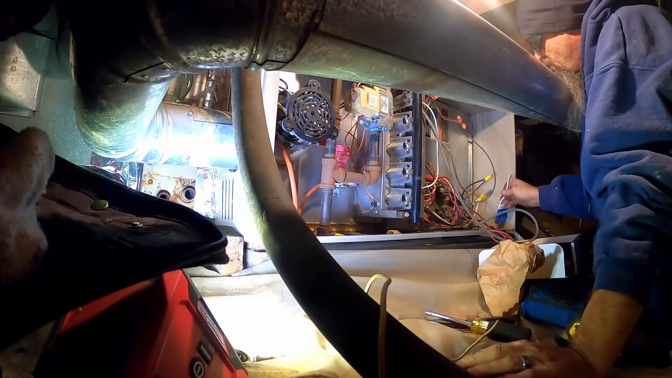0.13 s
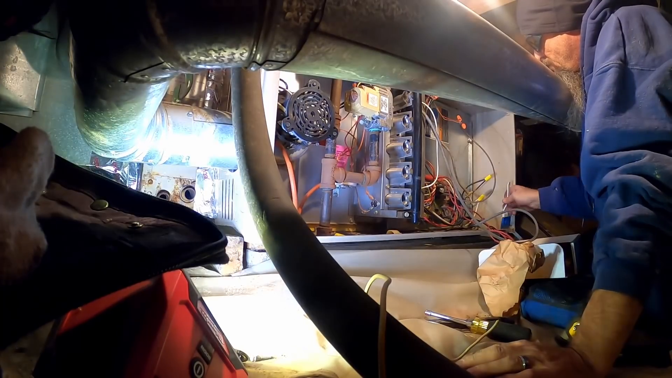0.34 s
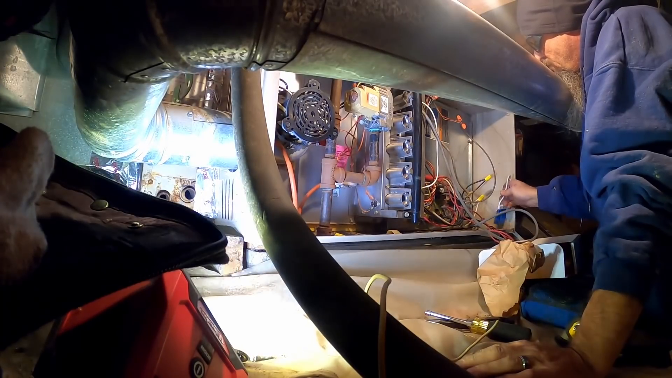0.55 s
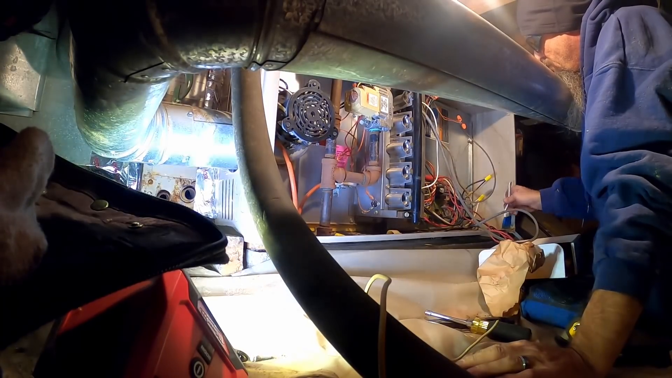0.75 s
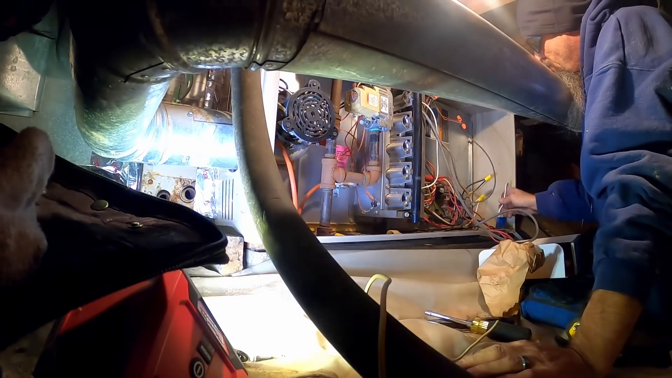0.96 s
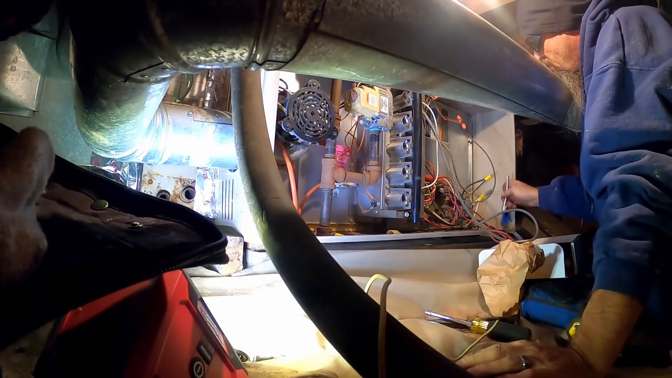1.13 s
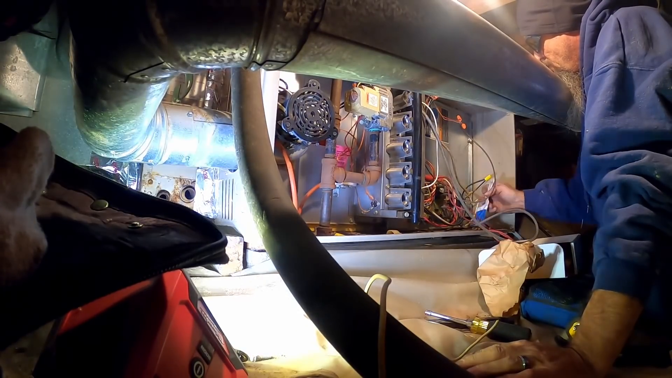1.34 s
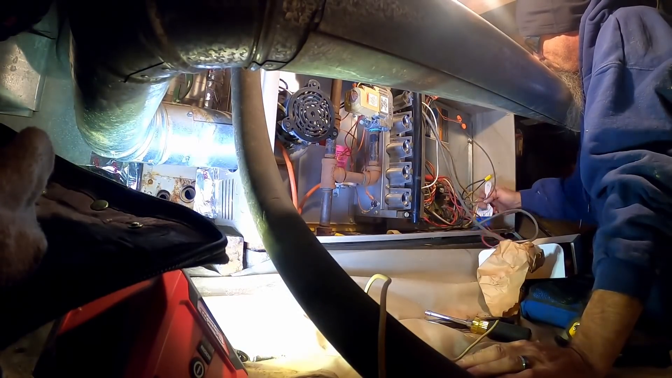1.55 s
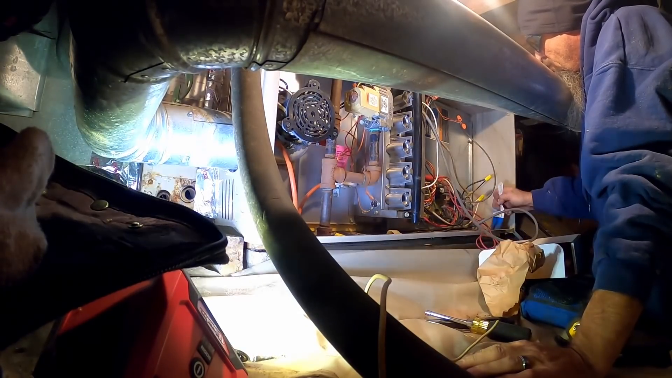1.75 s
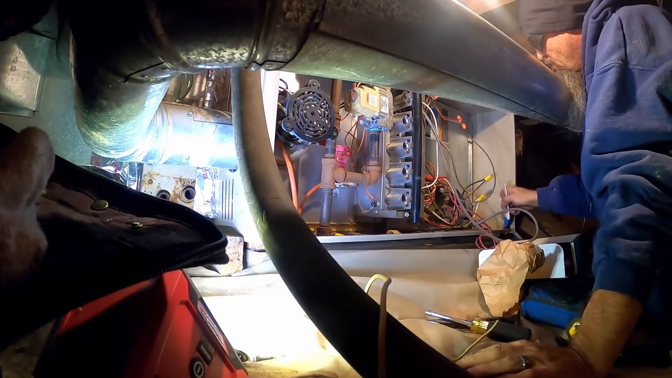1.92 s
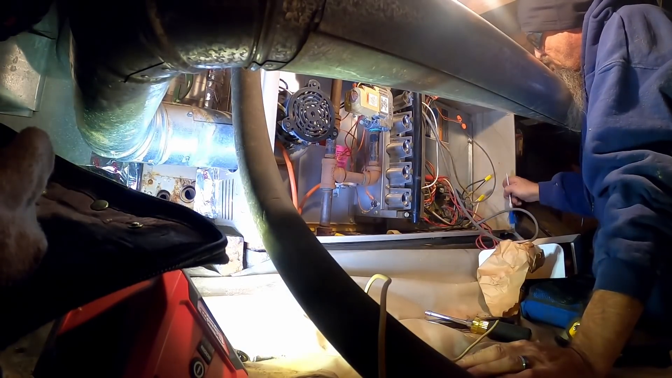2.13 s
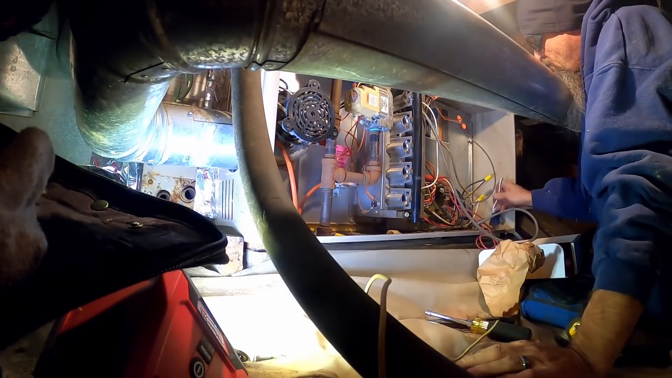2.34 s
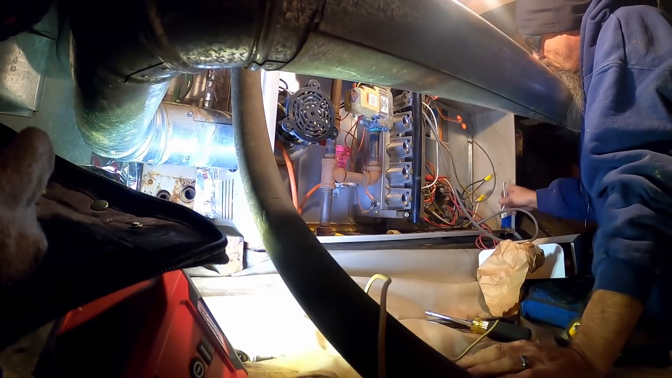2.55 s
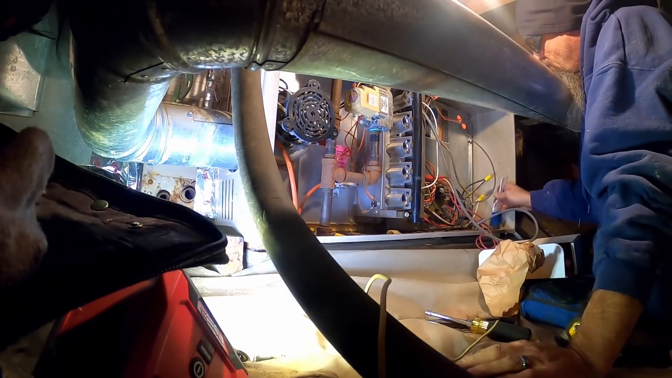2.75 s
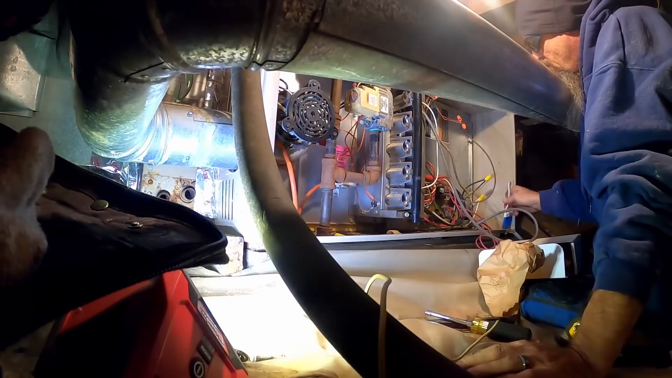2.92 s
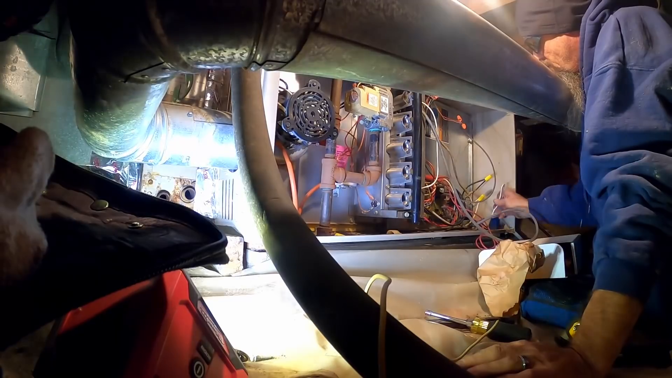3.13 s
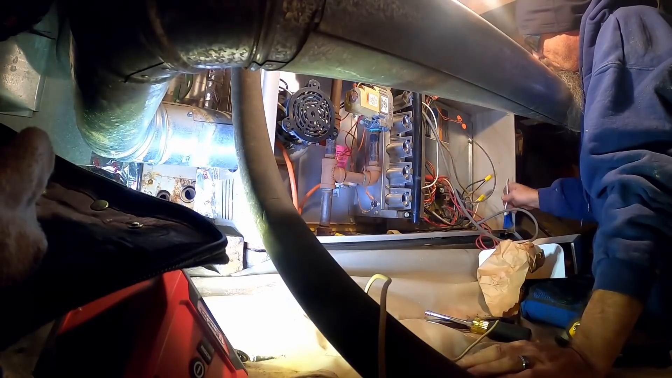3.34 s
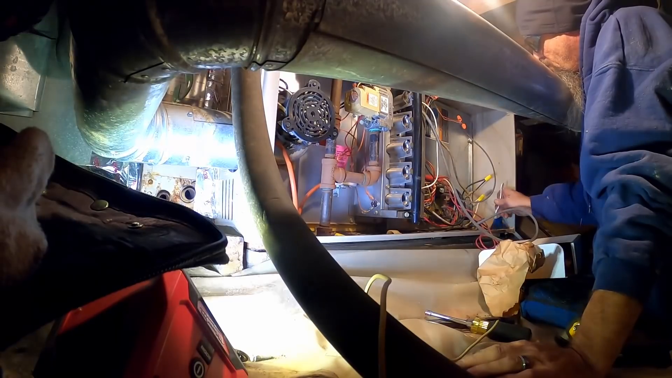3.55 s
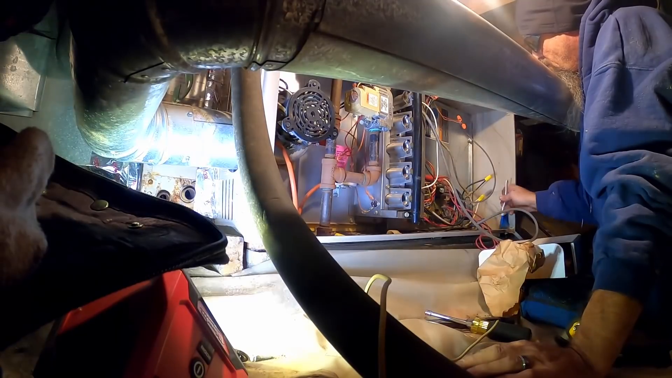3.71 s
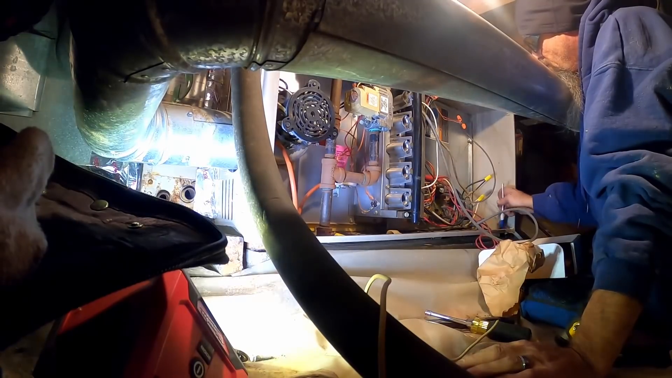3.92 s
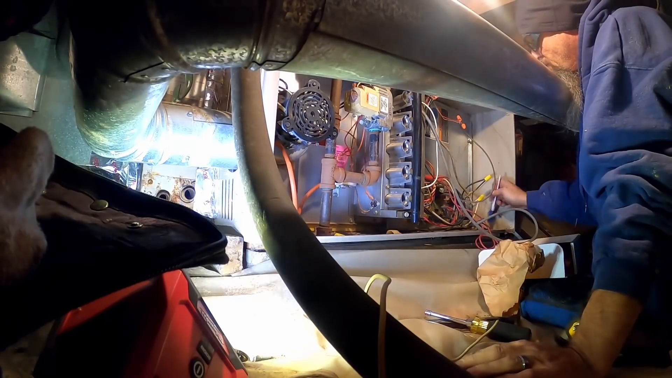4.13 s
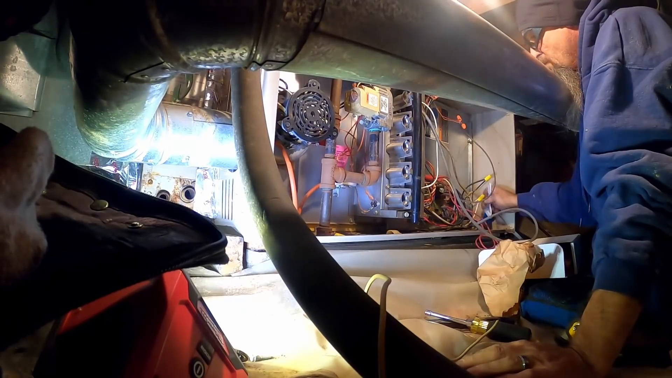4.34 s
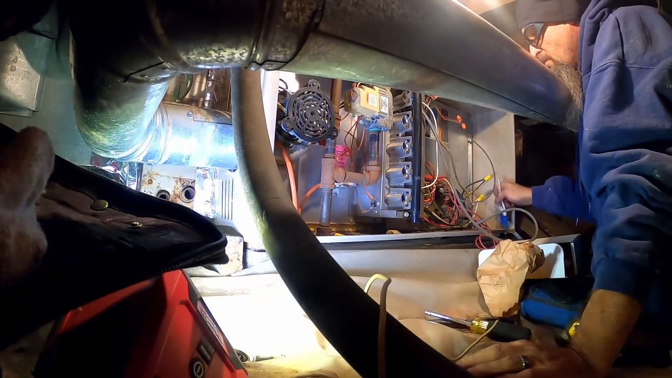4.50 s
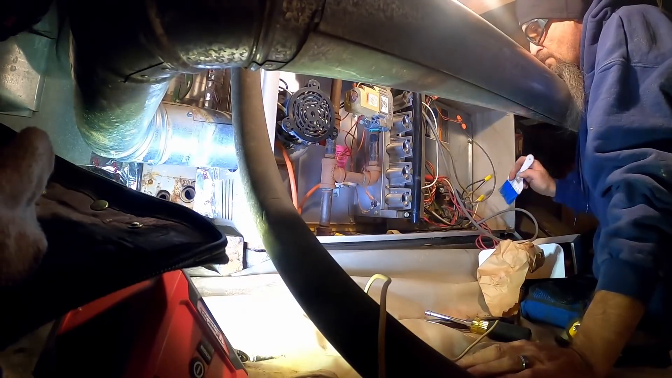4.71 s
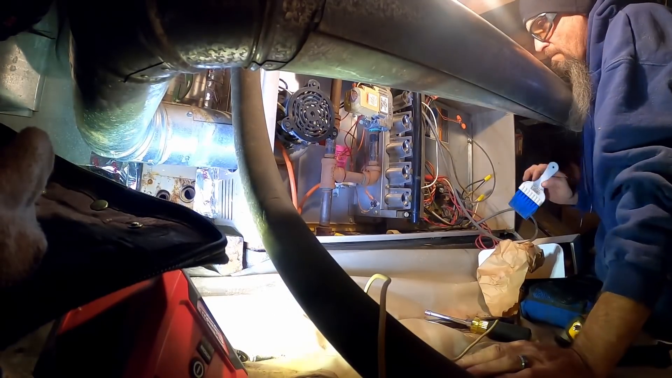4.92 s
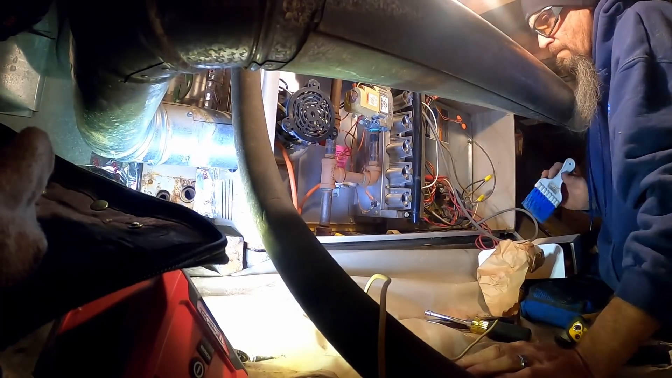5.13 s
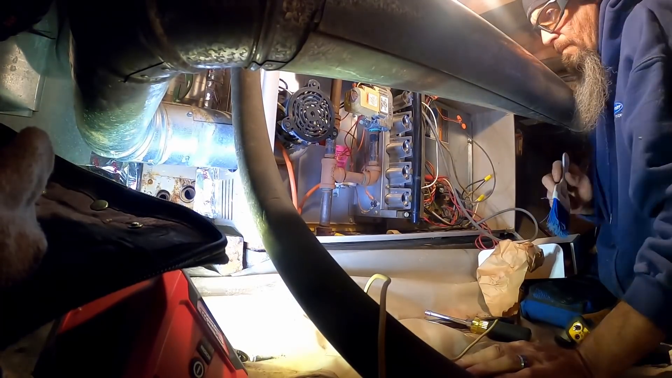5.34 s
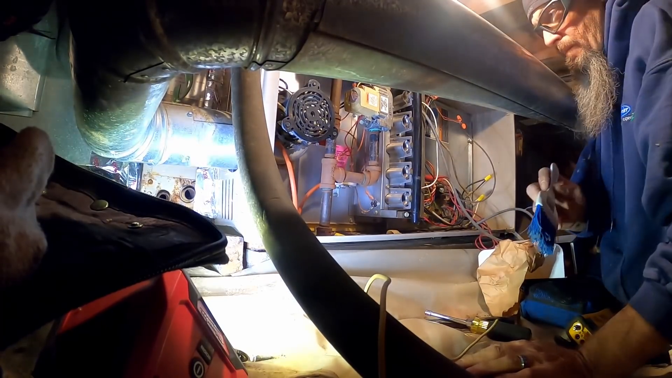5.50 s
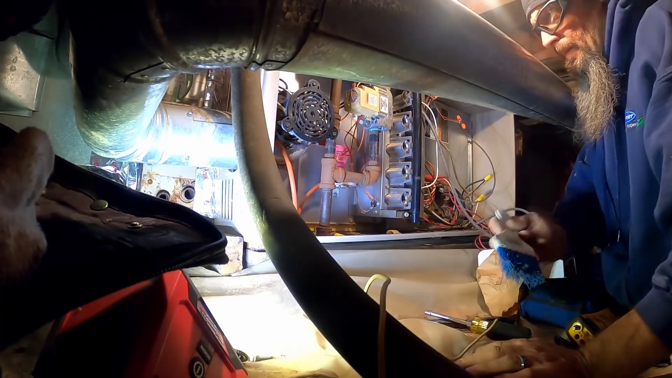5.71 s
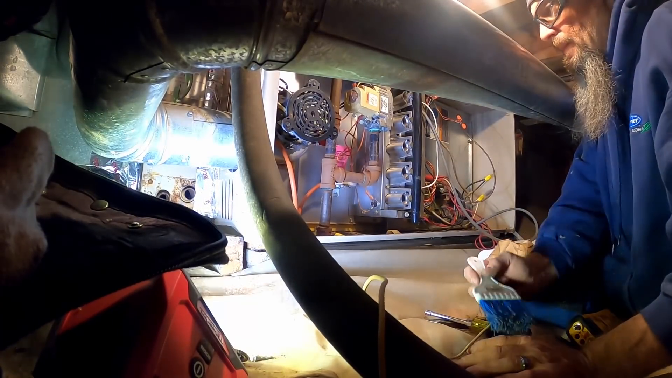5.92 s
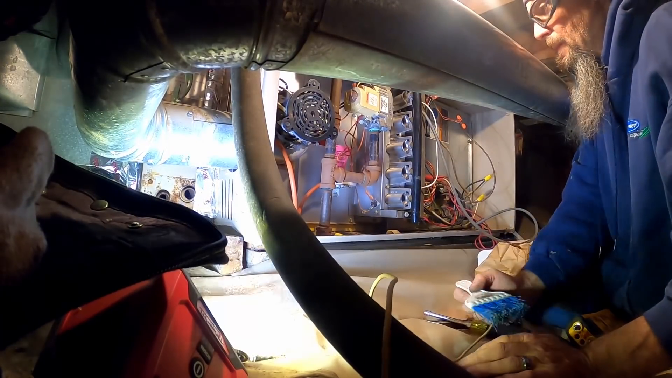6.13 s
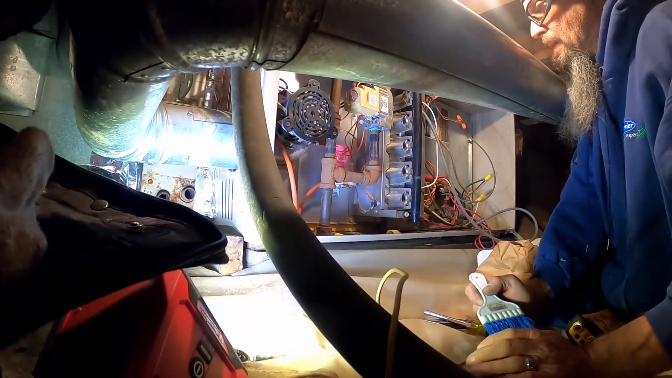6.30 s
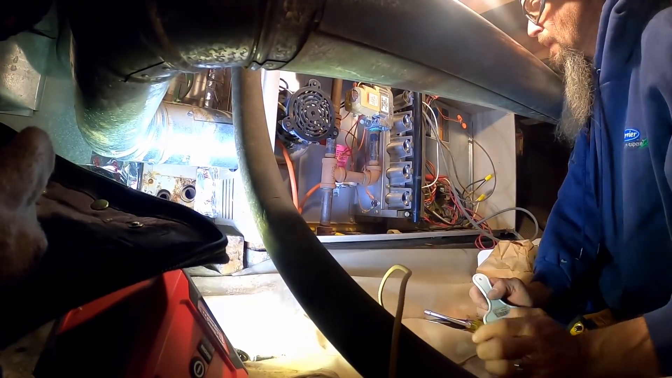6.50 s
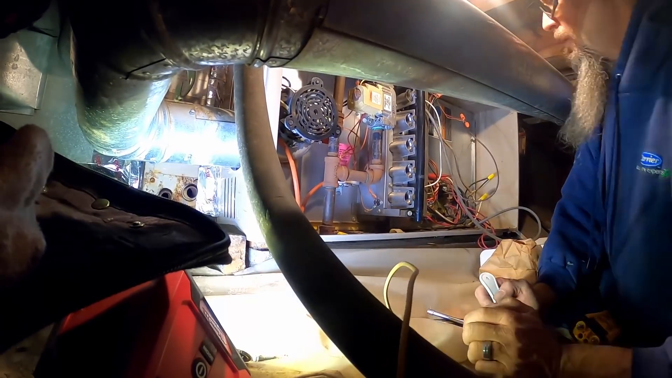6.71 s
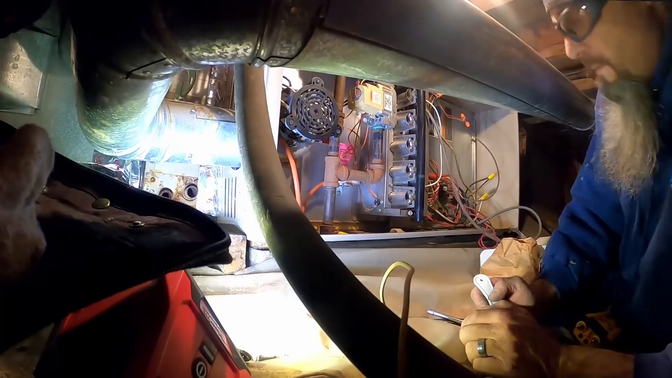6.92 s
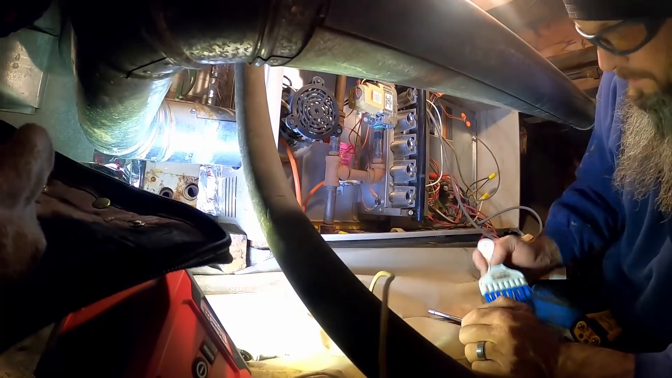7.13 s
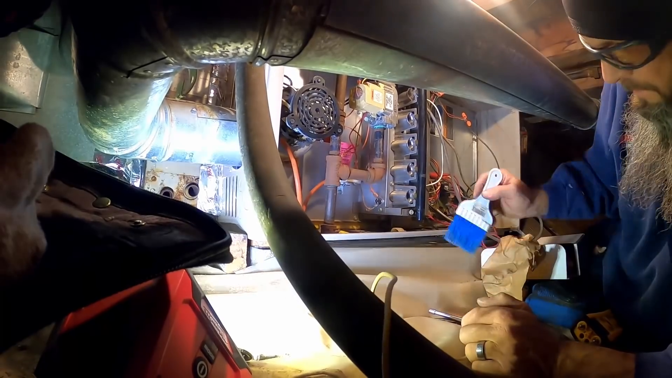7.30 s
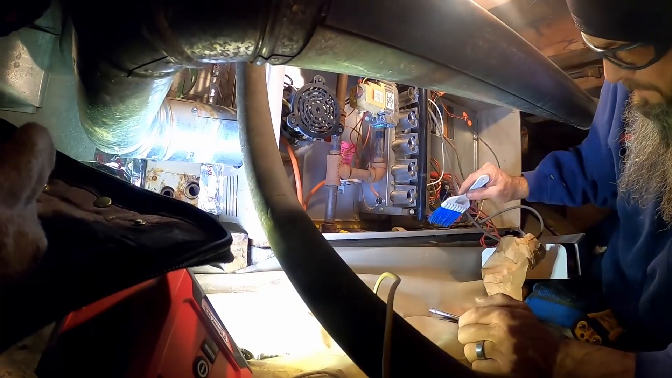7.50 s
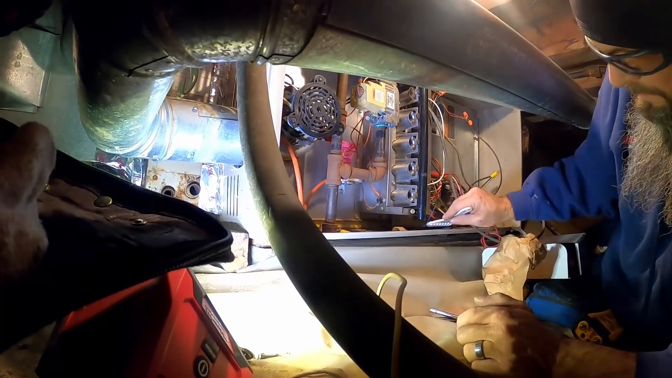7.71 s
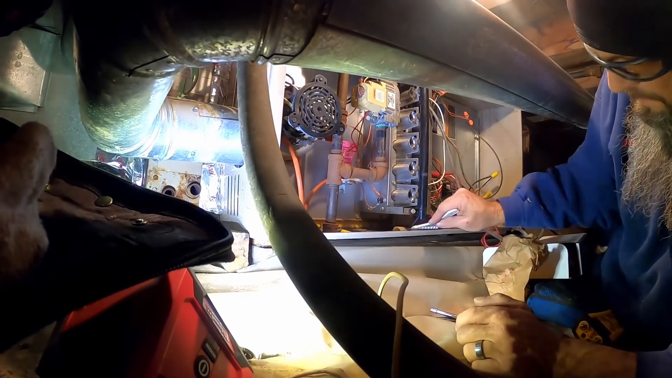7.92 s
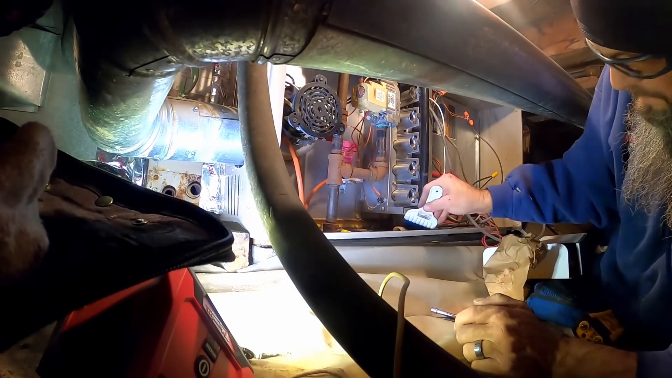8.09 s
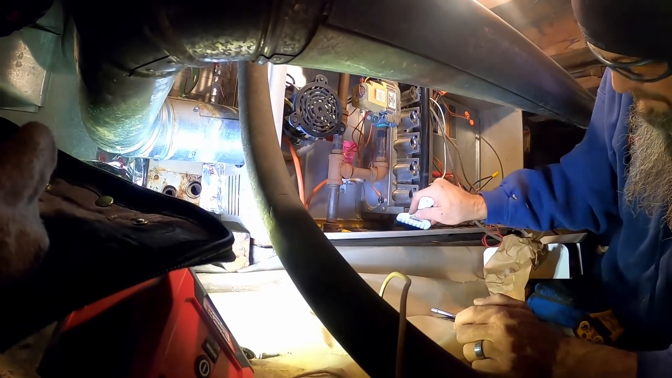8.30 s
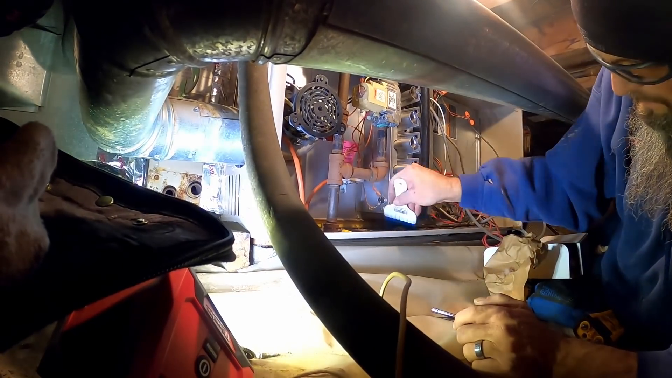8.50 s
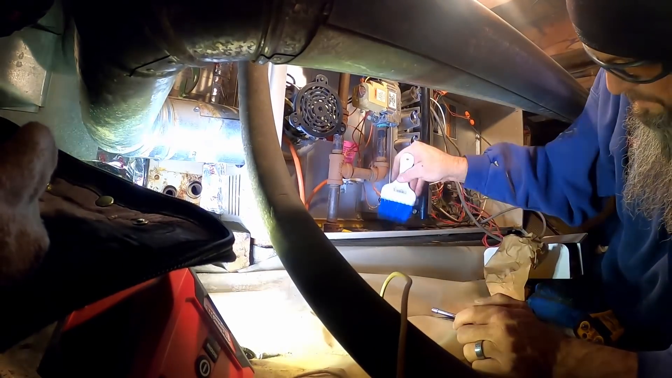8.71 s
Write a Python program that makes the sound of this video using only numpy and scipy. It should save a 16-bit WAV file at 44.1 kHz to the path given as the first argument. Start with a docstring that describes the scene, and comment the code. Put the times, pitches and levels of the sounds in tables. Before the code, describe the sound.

Close brushing inside a booming metal cabinet stops for cloth rustle, crunchy bristle flicks and a loud snap, then resumes with clanks.

```python
"""A paint brush dusts the inside of a sheet-metal furnace cabinet in a cramped crawl space.
On each stroke the bristles slap down, then drag and hiss (shaped noise) while the panels ring and boom.
Midway the brushing stops: a sleeve rustles and fingers riffle the bristles (grainy noise), with a few
sharp ticks (short pulses that ring briefly). Then the brushing resumes along the bottom ledge, which
rings and clanks. Faint low noise is the air of the space throughout."""
import sys
import numpy as np
from scipy import signal
from scipy.fft import rfft, irfft
from scipy.io import wavfile
from scipy.ndimage import uniform_filter1d

SR = 44100
rng = np.random.default_rng(int(sys.argv[2]) if len(sys.argv) > 2 else 0)


def digitize_waveform(pressure):
    """Quantize a signal to 16-bit integers and store it at the path in sys.argv[1].

    Rows of a 2-D input are taken as channels; values are limited to [-1, 1].
    """
    field = np.atleast_2d(pressure).T
    bounded = np.clip(field, -1, 1)
    quanta = np.round(bounded * 32767).astype(np.int16)
    wavfile.write(sys.argv[1], SR, quanta)


N = 385875
TIME_S = np.arange(N) / SR
BINS_HZ = np.fft.rfftfreq(N, 1 / SR)

# All levels in the tables are relative; the functions balance the layers.
# Bristles landing on metal: start_s, slap_db, panel_thump_db, t60_s (time to fade by 60 dB),
# brightness (-1 and below dull, 1 sharp)
SLAPS = [(0.148, -41, -70, 0.75, 0.94), (0.227, -45, -65, 0.11, 0.43), (0.272, -29.5, -28.5, 0.12, -1.2),
         (0.316, -30, -43, .06, 0.5), (0.401, -24.5, -31.5, 0.078, -0.89), (0.715, -29.5, -26, 0.24, -0.26),
         (1.05, -26.5, -21, 0.22, -0.19), (1.2, -40.5, -51, 0.13, 0.24), (1.355, -45.5, -65, 0.063, -1.2),
         (1.414, -28, -32, 0.11, -0.82), (1.502, -30, -30.5, 0.087, 0.67), (2.106, -43, -65.5, 0.031, 1),
         (2.151, -32, -45, 0.052, 0.6), (2.462, -31.5, -32, 0.089, -1.05), (2.866, -20, -24, 0.094, -0.85),
         (2.966, -27, -27.5, 0.055, -1.3), (3.206, -27, -31.5, 0.09, 0.036),
         (3.339, -25, -36.5, 0.064, 0.49), (3.588, -22, -26.5, 0.11, -0.63), (3.694, -27, -34, 0.068, 1),
         (3.924, -32, -29, 0.33, -0.76), (4.288, -22, -28, 0.13, -0.27), (4.455, -31.5, -54, 0.18, 0.21),
         (4.566, -29, -24, 0.033, 0.89), (7.859, -24, -25.5, 0.052, 0.094), (8.119, -30, -31.5, 0.14, -1.3),
         (8.172, -23.5, -27, 0.13, 0.6), (8.352, -34, -27.5, 0.13, 0.1)]
# Bristles dragged over the metal, swelling to a hardest moment and easing off:
# peak_s, rise_s, fall_s, tip_hiss_db, rub_db, panel_shake_db, cabinet_boom_db
DRAGS = [(0.04, 0.23, 0.14, -53.5, -48.5, -46, -30.5), (0.305, 0.15, 0.091, -62, -40.5, -52, -26),
         (0.424, 0.094, 0.036, -43, -34.5, -32, -31.5), (0.505, 0.11, 0.057, -48.5, -52, -41.5, -63),
         (0.681, 0.085, 0.07, -53.5, -47, -86, -60), (0.799, 0.051, 0.12, -42, -38.5, -40, -26.5),
         (0.895, 0.02, 0.1, -54.5, -50, -61, -33), (1.096, 0.015, 0.097, -45, -33.5, -44, -42),
         (1.204, 0.078, 0.025, -46, -37, -41, -26.5), (1.385, 0.066, 0.06, -57, -52, -65, -56),
         (1.46, 0.098, 0.053, -71, -39.5, -38, -40), (1.635, 0.17, 0.34, -46.5, -35.5, -41, -33),
         (1.93, 0.51, 0.26, -42, -34, -35, -29.5), (2.157, 0.056, 0.039, -38.5, -39, -50, -33),
         (2.595, 0.12, 0.15, -41.5, -33.5, -32, -30), (2.691, 0.38, 0.04, -42, -41.5, -42, -43),
         (2.802, 0.0062, 0.021, -43.5, -42.5, -47, -35), (2.84, 0.034, 0.026, -65, -46, -56, -44),
         (2.983, 0.11, 0.053, -40, -33, -34, -37), (3.054, 0.12, 0.054, -47, -41, -48, -48),
         (3.219, 0.071, 0.35, -49, -38.5, -32.5, -45), (3.346, 0.061, 0.12, -36, -31, -28, -26),
         (3.699, 0.062, 0.085, -37.5, -36, -25.5, -36), (3.81, .06, 0.23, -60, -62, -49, -34),
         (3.94, 0.036, .06, -49.5, -37.5, -37, -46), (3.995, 0.036, 0.14, -42.5, -37.5, -33, -34),
         (4.1, 0.051, 0.047, -51, -46.5, -59, -39.5), (4.24, 0.2, 0.26, -67, -63, -72, -55),
         (4.469, 0.13, 0.2, -47, -40.5, -37, -35), (4.568, 0.032, 0.064, -40.5, -39, -39, -32),
         (7.81, 0.067, 0.046, -45, -38.5, -38, -36), (7.97, 0.22, 0.34, -44.5, -34.5, -31, -29),
         (8.127, 0.034, 0.032, -41, -39, -21.5, -40), (8.225, 0.035, 0.37, -58, -43, -56, -29),
         (8.375, 0.064, 0.17, -49, -34.5, -39, -25.5), (8.51, 0.2, 0.14, -47, -36, -33, -24.5),
         (8.72, 0.12, .17, -45, -37, -30.5, -30)]
# Ringing modes of the cabinet panels: pitch_hz, level_db, t60_s
PANEL = [(102, -10.5, 0.46), (118.6, -8, 0.28), (145.2, -8, 0.36), (190, -6, 0.2), (216.4, -7, 0.64),
         (244.4, -8.5, 0.29), (302.7, -7, 0.18), (334.4, -8, 0.38), (388.2, -0.5, 0.31), (449, -14.5, 0.41),
         (481, -10, 0.32), (513, -8, 0.088), (594.6, -8, 0.13), (805, -17.5, 0.086)]

# After a landing the bristles skid on and lean into the panel
SKID_PEAK_S, SKID_RISE_S = 0.013, 0.017


def brush():
    """The tips hiss, the pressed bristles rub in tufts, and each landing is a dense slap that skids on."""
    # Noise spectra: pitch_hz, level_db (per Hz)
    hiss = [(800, -18.5), (2000, -10), (3500, 2), (5500, 1.5), (7500, -6.5), (9500, -12), (12000, -15.5),
            (16000, -29)]
    rub = [(400, 2.5), (750, -7.5), (950, -4.5), (1500, -1), (2800, -4.5), (4500, -10), (8000, -71),
           (16000, -58)]
    dull_slap = [(200, -8.5), (550, -2.5), (750, -7.5), (1000, -8), (1500, -6), (2800, -11.5), (4500, -18),
                 (9000, -34), (16000, -58)]
    sharp_slap = [(400, -56), (1300, -9.5), (3000, -2), (4500, -1), (6500, -8.5), (9000, -23), (16000, -89)]
    # Bright resonances of the metal: pitch_hz, width_hz, lift_db
    metal = [(1050, 36, 9.5), (1230, 68, 6.5), (1320, 25, 7.5), (1464, 42, 10), (1815, 43, 5),
             (2213, 24, 9.5), (2600, 21, 8.5), (2820, 14, 10), (3020, 23, 4.5), (3330, 25, 4.5),
             (3450, 13, 8.5), (3730, 26, 6.5), (4870, 140, 0), (5400, 110, 2), (6350, 160, 5),
             (8750, 1000, 7)]
    drag_curve = 1.45   # above 1 a drag has a rounder top and a cleaner start and end

    peak_s, rise_s, fall_s, hiss_db, rub_db, _, _ = np.transpose(DRAGS)
    start_s, slap_db, _, _, brightness = np.transpose(SLAPS)
    skid = swells(start_s + SKID_PEAK_S, slap_db - 8, SKID_RISE_S, fall_s=0.12)

    tip_force = np.hypot(swells(peak_s, hiss_db, rise_s, fall_s, drag_curve), from_db(-19.5) * skid)
    tips = from_db(6.0) * tip_force * friction(hiss, metal)
    rub_force = np.hypot(swells(peak_s, rub_db, rise_s, fall_s, drag_curve), skid)
    rubbing = rub_force * friction(rub, metal)
    drags = (tips + rubbing) * flicks(per_s=170, size_db=-1.0, t60_s=0.024)

    sharp_share = np.clip((1 + brightness) / 2, 0, 1)   # share of the slap's power
    dull_levels = from_db(slap_db) * np.sqrt(1 - sharp_share)
    sharp_levels = from_db(slap_db) * np.sqrt(sharp_share)
    dull = landings(dull_levels, hold_s=0.0079) * friction(dull_slap, metal)
    sharp = landings(sharp_levels, hold_s=0.0072) * friction(sharp_slap, metal)
    slaps = from_db(-2.0) * (dull + sharp) * flicks(per_s=290, size_db=-4.0, t60_s=0.0064)
    return drags + slaps


def rasps():
    """Bristles rasp over an edge: tufts stick and slip together around one pitch, grainy and brief."""
    # Narrow bands that sing: peak_s, level_db, centre_hz, width_hz, rise_s, fall_s
    rasp_bands = [(0.212, -40.5, 1800, 800, .012, 0.022), (0.233, -38, 1700, 600, 0.0055, .018),
                  (0.258, -41, 3600, 1200, .008, .02), (0.72, -29, 3370, 700, 0.0073, 0.033),
                  (0.74, -31, 2400, 1500, .01, 0.046), (1.058, -35, 1460, 350, 0.008, .07),
                  (1.422, -40, 2300, 600, 0.021, 0.038), (1.61, -44, 1085, 120, .12, .12),
                  (1.8, -42, 577, 140, 0.43, 0.43), (2.111, -35, 4900, 1000, .004, 0.028),
                  (2.162, -35.5, 1450, 219, .03, 0.035), (2.68, -42, 3400, 350, 0.12, 0.045),
                  (2.878, -24, 2480, 1400, 0.011, 0.034), (2.972, -39, 1500, 700, .008, 0.036),
                  (3.28, -38.5, 930, 400, 0.073, 0.052), (3.6, -30, 1290, 650, 0.01, 0.11),
                  (4.295, -34, 2460, 900, 0.0084, 0.04), (4.59, -34, 1490, 450, .025, 0.075),
                  (4.9, -58.5, 3970, 600, 0.092, 0.12), (6.21, -40.5, 1020, 150, 0.065, 0.084),
                  (6.328, -35, 2820, 2200, 0.022, 0.023), (6.6, -38, 3550, 600, 0.15, .1),
                  (6.682, -30, 1400, 1100, .01, 0.035), (7.035, -40, 2800, 2500, .015, 0.036),
                  (7.16, -46, 1050, 200, .05, .05), (7.867, -28.5, 1290, 330, 0.004, 0.043),
                  (7.998, -37, 940, 450, .02, 0.06), (8.128, -30, 1310, 450, .025, 0.046),
                  (8.41, -36, 956, 190, 0.064, 0.17), (8.51, -39.5, 1010, 300, 0.074, .08),
                  (8.71, -39, 950, 258, 0.062, 0.16)]
    shared = rng.standard_normal(N)
    apart = rng.standard_normal(N) * np.array([[1], [-1]])   # opposite at the two microphones
    slips = shared + from_db(-14) * apart
    out = 0
    for peak_s, level_db, hz, width_hz, rise_s, fall_s in rasp_bands:
        edges_hz = [hz - width_hz / 2, hz + width_hz / 2]
        band = signal.butter(2, edges_hz, "band", fs=SR, output="sos")
        tone = rms_one(signal.sosfilt(band, slips))
        out = out + swells([peak_s], level_db, rise_s, fall_s) * tone
    return out * flicks(per_s=240, size_db=-8.0, t60_s=0.012)


def squeaks():
    """The brush catches and slips in short, rough, wavering tones, with a scratch around each."""
    # Stick-slip squeaks: start_s, level_db, pitch_hz, length_s, pitch_rise (share of the pitch)
    squeak_list = [(1.457, -23.5, 1110, .011, -0.11), (1.468, -33, 1050, .016, -0.0042),
                   (1.559, -32.5, 1085, 0.011, 0), (1.585, -38, 1080, .009, 0), (1.604, -38, 1090, .01, 0),
                   (1.634, -26.5, 1070, 0.018, 0.06), (1.652, -32, 1090, 0.017, -.04),
                   (1.701, -22.5, 1070, 0.011, 0.053), (6.274, -42, 1030, 0.067, 0.14),
                   (6.322, -30.5, 1250, 0.029, 0.24)]
    waver = 0.028 * drift(600)   # unsteadiness as a share of the pitch
    rough = from_db(3.7 * drift(250))
    band = signal.butter(2, [800, 1900], "band", fs=SR, output="sos")
    scratch = from_db(-22) * rms_one(signal.sosfilt(band, rng.standard_normal(N)))
    out = np.zeros(N)
    for start_s, level_db, hz, length_s, pitch_rise in squeak_list:
        on = (TIME_S > start_s) & (TIME_S < start_s + length_s)
        done = (TIME_S[on] - start_s) / length_s   # 0 at the start, 1 at the end
        turns = np.cumsum(hz * (1 + waver[on] + pitch_rise * (done - .5))) / SR
        shape = from_db(level_db) * np.sin(np.pi * done ** 0.85)
        out[on] += shape * (np.sin(2 * np.pi * turns) + scratch[on])
    return out * rough


def cabinet():
    """Drags and landings shake the sheet metal; the whole box booms, and flexes when the arm leans on it."""
    # Modes of the bottom ledge, which rings under the last strokes: pitch_hz, level_db, t60_s
    ledge_modes = [(222, -11, 0.23), (389.4, -1.5, 0.3), (825, -17, 0.046), (953, -16, 0.08),
                   (1237, -17, 0.073)]
    # Modes of the ledge's folded rim, which clanks under landings: pitch_hz, level_db, t60_s
    rim_modes = [(1500, -12, .07), (1800, -12, 0.085), (2160, -15, 0.12), (2860, -6, 0.029),
                 (3320, -10, .015)]
    # The arm leans on the cabinet: peak_s, boom_db, deep_flexing_db
    leans = [(1.3, -49.5, -60), (1.59, -27.5, -45), (1.76, -25, -39), (1.93, -36, -42), (2.24, -41.5, -50),
             (3.43, -42, -46), (3.53, -35, -48), (3.78, -34.5, -36), (3.97, -31.5, -29), (4.64, -44, -32.5),
             (4.83, -40, -40), (5.26, -43, -46), (5.42, -52, -65), (6.12, -39.5, -46), (6.23, -52, -56),
             (6.75, -27.5, -31), (6.92, -29, -47), (7.12, -37.5, -40), (7.39, -41, -42), (7.52, -37, -50),
             (7.66, -37.5, -41), (8.24, -29, -52), (8.43, -25, -37), (8.58, -24, -39)]
    # Noise spectra of the box booming and flexing: pitch_hz, level_db (per Hz)
    boom = [(20, -50), (40, -9), (52, -4), (66, 3.5), (90, -4), (120, -10.5), (150, -11.5), (200, -20.5),
            (400, -29), (1000, -86)]
    flex = [(10, -39), (24, -12), (39, -4), (48, -15), (70, -38), (300, -87)]
    boom_rise_s, boom_fall_s = 0.12, 0.47   # the heavy box is slow to start and to stop
    boom_curve = 0.89                       # roundness of the boom's swells
    lean_rise_s, lean_fall_s = 0.13, 0.25
    ledge_from_s = 7.7                      # from here on the brush works along the ledge

    peak_s, rise_s, fall_s, _, _, shake_db, boom_db = np.transpose(DRAGS)
    start_s, slap_db, thump_db, _, _ = np.transpose(SLAPS)
    lean_s, lean_boom_db, lean_flex_db = np.transpose(leans)
    shake = swells(peak_s, shake_db, rise_s, fall_s)
    thump = swells(start_s + SKID_PEAK_S, thump_db, SKID_RISE_S, fall_s=0.1)
    on_ledge = TIME_S > ledge_from_s
    on_panel = np.where(on_ledge, from_db(-6.5), 1)

    # A thump is soft and favours the low modes: 2 dB less for each octave up, pivoting at 280 Hz
    softened = [(hz, db - 2 * np.log2(hz / 280), t60_s) for hz, db, t60_s in PANEL]
    sheets = struck(PANEL, shake * on_panel) + struck(softened, thump * on_panel)
    ledge = struck(ledge_modes, from_db(0.5) * np.hypot(shake, thump) * on_ledge)
    clank_force = landings(from_db(slap_db), hold_s=0.0086) * on_ledge
    clank = struck(rim_modes, from_db(6.0) * clank_force)

    drag_boom = swells(peak_s, boom_db, boom_rise_s, boom_fall_s, boom_curve)
    slap_boom = swells(start_s + SKID_PEAK_S, thump_db - 5, SKID_RISE_S, boom_fall_s, boom_curve)
    lean_boom = swells(lean_s, lean_boom_db, lean_rise_s, lean_fall_s, boom_curve)
    boom_force = from_db(-2.06) * np.sqrt(drag_boom ** 2 + slap_boom ** 2 + lean_boom ** 2)
    booming = boom_force * steady(friction(boom))
    flexing = swells(lean_s, lean_flex_db, lean_rise_s, lean_fall_s) * steady(friction(flex))
    return sheets + ledge + clank + booming + flexing


def knocks():
    """The brush head bumps a panel: modes near the favoured pitch ring and die away cleanly."""
    # Bumps: start_s, level_db, favoured_hz (pitch that the struck spot favours)
    bumps = [(0.274, -31, 482), (0.284, -20, 142), (0.327, -38, 485), (0.404, -29, 485), (0.412, -20, 147),
             (0.717, -28, 580), (0.725, -22.5, 188), (0.85, -29, 190), (1.056, -23.5, 388),
             (1.075, -28.5, 102), (1.51, -28.5, 310), (1.537, -21.5, 100), (1.885, -26.5, 146),
             (2.49, -30.5, 388), (2.584, -28, 160), (2.971, -20, 145), (2.991, -25.5, 330),
             (3.21, -27.5, 388), (3.255, -25, 388), (3.595, -25.5, 205), (3.684, -36, 190),
             (3.93, -27.5, 220), (4.506, -20.5, 144), (5.09, -42, 170), (6.198, -33.5, 113),
             (6.204, -54, 328), (6.675, -26.5, 159), (6.756, -24, 125), (8.125, -18, 388),
             (8.345, -26.5, 350), (8.355, -19, 166), (8.661, -32.5, 390)]
    focus_db, rise_s = 27, 0.0035   # a mode one octave from the favoured pitch is 27 dB weaker
    out, age_s = np.zeros(N + SR), np.arange(SR // 2) / SR
    hz, mode_db, t60_s = np.transpose(PANEL)[:, :, None]
    for start_s, level_db, favoured_hz in bumps:
        share = from_db(mode_db - focus_db * np.abs(np.log2(hz / favoured_hz)))
        share = share / np.linalg.norm(share)
        tones = np.sin(2 * np.pi * (hz * age_s + rng.random(hz.shape)))
        modes = share * from_db(-60 * age_s / t60_s) * tones
        knock = from_db(level_db) * (1 - np.exp(-age_s / rise_s)) * modes.sum(axis=0)
        first = int(start_s * SR)
        out[first:first + len(age_s)] += knock
    return out[:N]


def sways():
    """A whole wall sways under the arm for a few slow cycles, a deep throb."""
    # Throbs: peak_s, level_db, pitch_hz, rise_and_fall_s (each way)
    throbs = [(3.985, -24, 39.2, 0.12), (7.58, -29, 27, 0.12)]
    out = 0
    for peak_s, level_db, hz, span_s in throbs:
        out = out + swells([peak_s], level_db, span_s, span_s, curve=2.3) * np.sin(2 * np.pi * hz * TIME_S)
    return out


def hands():
    """A sleeve's cloth rustles; bristles flicked by the fingers crunch in uneven bunches."""
    # The sleeve stirs while brushing, then fingers riffle the bristles: time_s, rustle_db
    riffle = [(0, -58), (1.0, -70), (2.3, -61.5), (4.25, -81), (4.75, -76), (5.048, -64.5), (5.95, -58),
              (6.4, -46.5), (6.66, -33), (6.82, -40.5), (7.04, -42.5), (7.33, -53.5), (7.7, -60.5)]
    # Bunches of bristles or folds of sleeve that give way: peak_s, rustle_db, crunch_db
    bunches = [(5.265, -60, -73), (5.41, -60, -81), (5.585, -52, -66), (6.0, -51.5, -60),
               (6.109, -44.5, -41.5), (6.212, -42.5, -51), (6.33, -45, -71), (6.724, -42, -29),
               (6.775, -55, -43), (6.83, -56, -34.5), (6.889, -41, -33.5), (6.93, -49, -38),
               (7.008, -50, -41), (7.055, -60, -41.5), (7.11, -67, -44.5), (7.286, -48, -48.5),
               (7.386, -56, -49.5)]
    # Noise spectra: pitch_hz, level_db (per Hz)
    rustle_spectrum = [(400, -11), (1500, -4), (3600, -3), (5000, -5), (7500, -13), (10000, -19),
                       (16000, -40)]
    crunch_spectrum = [(60, -34), (130, 11.5), (250, 5), (450, 2.5), (700, -4.5), (1000, 0), (1700, -8),
                       (3000, -7), (6000, -26), (16000, -70)]
    # Resonances of the bristle pack under the fingers: pitch_hz, width_hz, lift_db
    pack = [(1200, 250, 5.5), (1700, 250, 4.5), (3550, 350, 2)]
    bunch_rise_s, bunch_fall_s = 0.082, 0.069
    crunch_from_s = 6.67   # the fingers only stroke the bristles until they snap into the pack

    time_s, level_db = np.transpose(riffle)
    busy_db = np.interp(TIME_S, time_s, level_db, left=-120, right=-120)
    # The crunch grows 1.53 dB for each dB of rustle
    riffle_crunch = from_db(level_db.max() - 2.5 + 1.53 * (busy_db - level_db.max()))
    riffle_crunch = riffle_crunch * np.where(TIME_S > crunch_from_s, 1, from_db(-11.5))
    peak_s, rustle_db, crunch_db = np.transpose(bunches)
    rustle = np.hypot(from_db(busy_db), swells(peak_s, rustle_db, bunch_rise_s, bunch_fall_s))
    crunch = np.hypot(riffle_crunch, swells(peak_s, crunch_db, bunch_rise_s, bunch_fall_s))
    fine = from_db(3.0) * rustle * friction(rustle_spectrum, pack)
    coarse = from_db(5.5) * crunch * friction(crunch_spectrum)
    coarse = coarse * flicks(per_s=67, size_db=2.0, t60_s=0.03)
    return (fine + coarse) * flicks(per_s=200, size_db=0.0, t60_s=0.026)


def ticks():
    """A hard contact gives a short pulse, one rebound, a brief ring and a spray of close reflections."""
    # Ticks and knocks of the brush handle and loose bits: start_s, peak_db, pitch_hz, t60_s
    contacts = [(0.316, -20, 3180, 0.05), (0.679, -23.5, 2600, 0.044), (.717, -16, 3420, 0.057),
                (2.108, -26, 4680, .06), (4.503, -29, 249, 0.13), (4.94, -41, 5000, 0.036),
                (5.146, -45.5, 2200, .06), (5.251, -40, 2180, 0.22), (5.579, -33.5, 2500, 0.055),
                (5.752, -31, 2600, 0.21), (5.79, -18, 1400, 0.055), (5.792, -28.5, 520, 0.055),
                (5.843, -32, 2490, 0.073), (5.936, -20, 1920, 0.068), (6.101, -17, 1700, 0.039),
                (6.207, -28, 650, 0.041), (6.234, -16, 4030, 0.032), (6.321, -20.5, 1880, 0.18),
                (6.413, -13.5, 3140, 0.051), (6.543, -19.5, 2500, 0.045), (6.669, 1, 2450, 0.018),
                (6.708, -12, 1400, 0.04), (6.721, -12, 1200, 0.03), (6.725, -10, 1730, 0.017),
                (6.771, -12.5, 1900, 0.034), (6.777, -18, 1400, 0.026), (6.817, -20, 1800, 0.033),
                (6.826, -20, 1500, 0.057), (6.871, -15, 2260, 0.059), (6.881, -21, 1500, .05),
                (6.918, -13.5, 1500, 0.047), (6.923, -15, 1300, 0.041), (7.014, -20, 6750, 0.03),
                (7.093, -12, 2340, 0.037), (7.12, -25, 1820, 0.079), (7.262, -14.5, 1790, 0.032),
                (7.29, -30, 3500, 0.027), (7.392, -29.5, 293, 0.13), (7.401, -18.5, 4120, 0.019),
                (7.484, -17.5, 4200, 0.038), (7.599, -30.5, 3540, 0.051), (7.861, -12.5, 3020, 0.043),
                (8.176, -8, 2630, 0.091)]
    out, age_s = np.zeros((2, N)), np.arange(N // 40) / SR
    top_hz = .45 * SR
    for start_s, peak_db, hz, t60_s in contacts:
        shared, apart = rng.standard_normal((2, len(age_s)))
        spray = shared + from_db(-3.0) * apart * [[1], [-1]]
        spray = spray * from_db(-22.0 - 60 * age_s / t60_s)
        rebound_s = 0.0006 * rng.uniform(.5, 1.5)
        rebound = np.arange(len(age_s)) == int(rebound_s * SR)
        contact = (age_s == 0) + from_db(-8.5) * rebound + spray
        body = signal.butter(2, [hz / 2.86, min(hz * 1.66, top_hz)], "band", fs=SR, output="sos")
        soft = signal.butter(2, min(hz * 3.4, top_hz), fs=SR, output="sos")
        tick = signal.sosfilt(soft, signal.sosfilt(body, contact))
        tick = tick + from_db(-24) * ring(contact, hz, 0.002) + from_db(-48) * contact
        first = int(start_s * SR)
        out[:, first:first + len(age_s)] += from_db(peak_db) * tick / np.abs(tick).max()
    return out


def carried(x):
    """Sounds made in the hands follow them from side to side."""
    # Side-to-side place of the hands: time_s, left_minus_right_db
    hand_pan = [(4.7, 0), (5.2, 0), (5.75, -2), (6.0, -0.5), (6.9, 0), (7.09, 1.5), (7.26, 0.5),
                (7.48, 2.5), (7.8, -3)]
    time_s, pan_db = np.transpose(hand_pan)
    return x * from_db(np.interp(TIME_S, time_s, pan_db) * np.array([[.5], [-.5]]))


def air():
    """The air of the space is faint, steady noise, strongest at low pitch."""
    # Noise spectrum: pitch_hz, level_db (per Hz)
    air_spectrum = [(20, -2), (70, -4.5), (200, -14.5), (700, -30), (3000, -45.5), (8000, -39.5),
                    (16000, -66)]
    return from_db(-52.5) * friction(air_spectrum)


def friction(spectrum, resonances=()):
    """Noise for countless tiny slips, coloured by spectrum and resonances; stereo, unit power."""
    # Sound scattered by the cabinet, opposite at the two microphones: pitch_hz, level_db (against direct)
    scatter = [(60, -27.5), (300, -12.5), (700, -10), (1400, -9), (3000, -11.5), (7000, -3.5),
               (15000, -0.5)]
    lift_db = sum(db / (1 + (2 * (BINS_HZ - hz) / width_hz) ** 2) for hz, width_hz, db in resonances)
    shape = (2, len(BINS_HZ))
    slips = rng.standard_normal(shape) + 1j * rng.standard_normal(shape)
    direct, scattered = slips * response(spectrum) * from_db(lift_db)
    return rms_one(irfft(direct + scattered * response(scatter) * [[1], [-1]], N))


def struck(modes, force):
    """Friction feeds each mode, whose swing follows the force and rings on after it."""
    evenness = 0.8   # 0: a mode swells by chance, 1: it follows the force exactly
    drive, out = force * rng.standard_normal(N), 0
    for k, (hz, level_db, t60_s) in enumerate(modes):
        swing = ring(drive, hz, t60_s)
        keep = from_db(-60 / (t60_s * SR)) ** 2   # power kept from one sample to the next
        fed = signal.lfilter([1 - keep], [1, -keep], force ** 2 + 1e-14)
        due, got = np.abs(uniform_filter1d([fed, swing ** 2], size=1500)) + 1e-12
        evened = swing * (due / got) ** (evenness / 2)
        out = out + from_db(level_db - 5.0 + 1.8 * drift(14)) * evened * (-1) ** k
    return out


def ring(drive, hz, t60_s):
    """A decaying mode that keeps the power of a white drive."""
    r, w = from_db(-60 / (t60_s * SR)), 2 * np.pi * hz / SR
    gain = np.sqrt((1 - r * r) / 2)
    return signal.lfilter(gain * np.array([1, 0, -1]), [1, -2 * r * np.cos(w), r * r], drive + 1e-18)


def landings(levels, hold_s):
    """Bristles land one after another for a moment, then settle: one swell of given level for each slap."""
    out, age_s = np.zeros(N), np.arange(N // 32) / SR
    for (start_s, _, _, t60_s, _), level in zip(SLAPS, levels):
        fade = from_db(-60 * np.maximum(age_s - hold_s, 0) / t60_s)
        shape = (1 - np.exp(-age_s / 0.00088)) * fade
        first = int(start_s * SR)
        out[first:first + len(age_s)] += level * shape
    return out


def swells(peaks_s, levels_db, rise_s, fall_s, curve=1):
    """A gain that rises to each peak, holds a moment and falls away; overlapping swells add in power."""
    span_db, hold_s = 25, 0.0081   # rise and fall times cover this many dB
    t = np.arange(0, N, 32) / SR   # worked out coarsely, then joined by lines
    age_s = t[:, None] - np.asarray(peaks_s)
    before = np.maximum(-age_s - hold_s / 2, 0) / rise_s
    after = np.maximum(age_s - hold_s / 2, 0) / fall_s
    gains = from_db(levels_db - span_db * np.minimum((before + after) ** curve, 10))
    return np.interp(TIME_S, t, np.sqrt(np.sum(gains ** 2, axis=1)))


def flicks(per_s, size_db, t60_s):
    """Tufts snag and let go at random: a gain with sudden jumps that die away; unit power."""
    chance, size = rng.random(N), np.minimum(rng.exponential(1, N), 3.5)
    jumps = (chance < per_s / SR) * size ** 2
    power = signal.lfilter([1], [1, -from_db(-120 / (t60_s * SR))], jumps)
    return rms_one(np.sqrt(1 + from_db(size_db) ** 2 * power))


def shifting(x, patchy_db, count):
    """The point of contact keeps moving, so each band swells and fades by itself."""
    place = np.interp(np.log(BINS_HZ + 1), np.log([500, 12000]), [0, count - 1])
    bins, out = rfft(x), 0
    for k in range(count):
        band = irfft(bins * np.maximum(1 - np.abs(place - k), 0), N)
        out = out + band * from_db(patchy_db * drift(60))
    return out


def steady(x):
    """Even out the chance swells of a low rumble."""
    return x / np.sqrt(uniform_filter1d(x ** 2, size=4000) + 0.064)


def drift(rate):
    """Chance values, about rate of them a second, joined by straight lines; unit power."""
    knots = rng.standard_normal(int(N / SR * rate) + 2)
    return rms_one(np.interp(TIME_S * rate, np.arange(len(knots)), knots))


def response(points):
    """A spectrum as a gain on every frequency bin."""
    hz, level_db = np.transpose(points)
    return from_db(np.interp(np.log(BINS_HZ + 1), np.log(hz), level_db))


def rms_one(x):
    """Scale to unit power."""
    return x / np.sqrt(np.mean(x ** 2) + 1e-20)


def from_db(db):
    """Decibels to gain."""
    return np.exp(np.asarray(db) * np.log(10) / 20)


def scene():
    """Mix all the sources; the left microphone hears everything later and duller than the right."""
    # Tone of the left side against the right: pitch_hz, left_minus_right_db
    left_shade = [(60, -0.5), (4500, 0), (8000, -2), (15000, -6)]
    left_lag_s = 0.00005
    bristles = shifting(brush() + carried(hands()), patchy_db=2.0, count=12)
    metal_box = cabinet() + knocks() + sways()
    left, right = bristles + metal_box + rasps() + squeaks() + carried(ticks()) + air()
    shade = np.sqrt(response(left_shade))   # half the difference goes to each side
    lag = np.exp(-2j * np.pi * BINS_HZ * left_lag_s)
    return irfft([rfft(left) * shade * lag, rfft(right) / shade], N)


def record(dry):
    """Full scale limits the peaks, and the treble above the cutoff is removed."""
    cutoff_hz = 15850
    low_pass = signal.ellip(10, .1, 80, cutoff_hz, fs=SR, output="sos")
    return signal.sosfilt(low_pass, np.clip(dry, -1, 1))


dry = scene()
out = record(dry)
digitize_waveform(out)
```